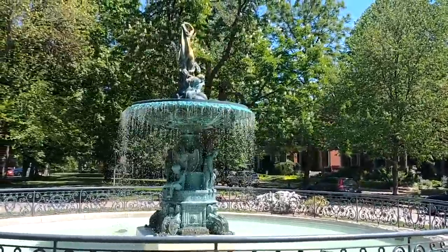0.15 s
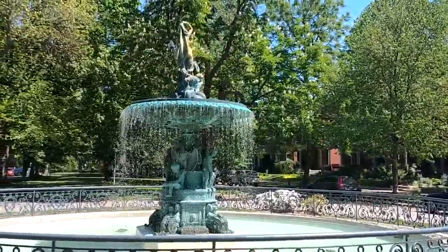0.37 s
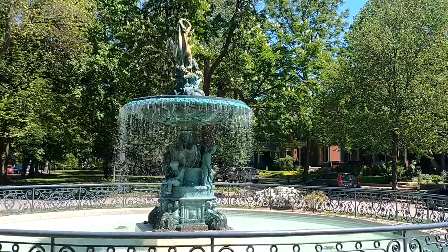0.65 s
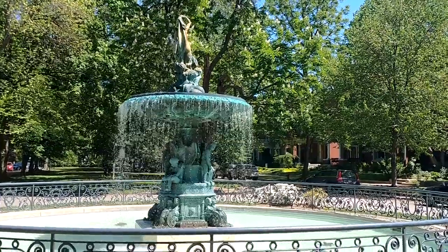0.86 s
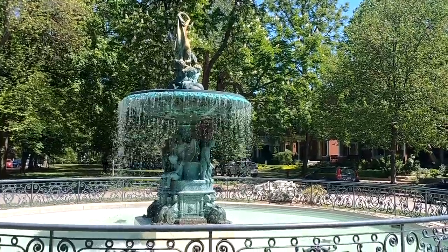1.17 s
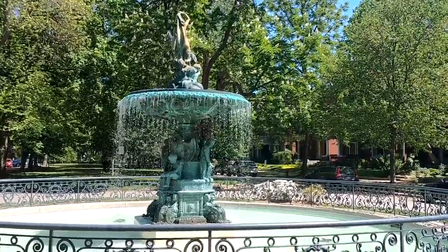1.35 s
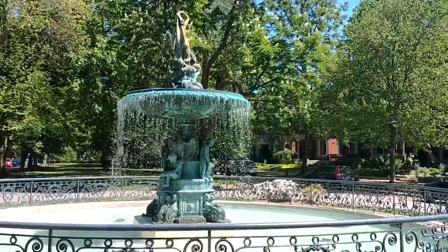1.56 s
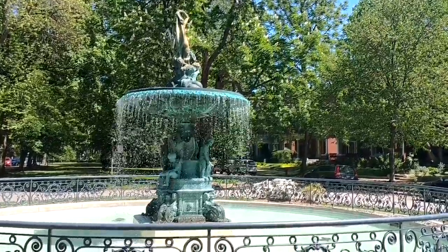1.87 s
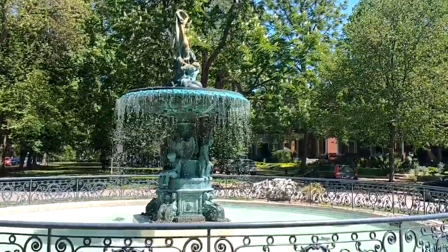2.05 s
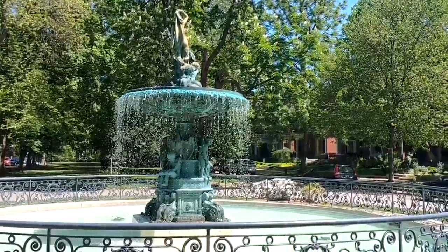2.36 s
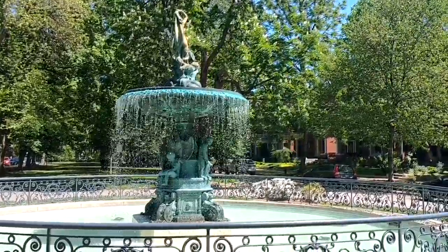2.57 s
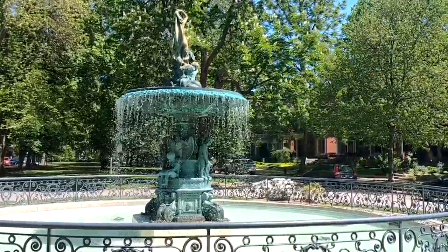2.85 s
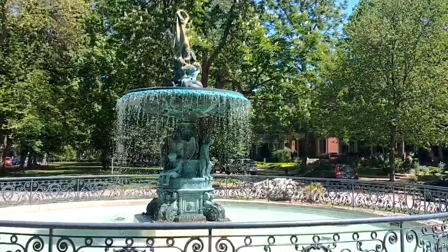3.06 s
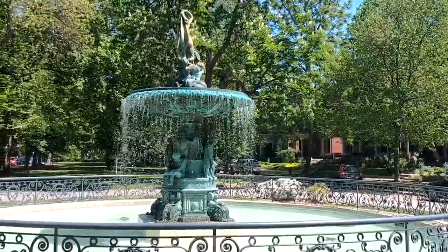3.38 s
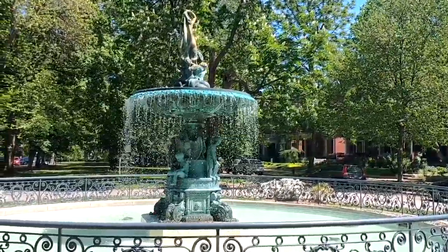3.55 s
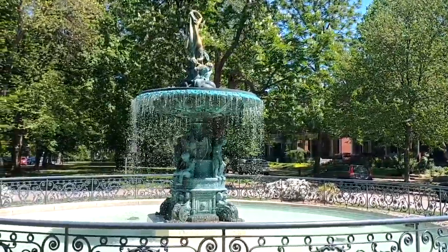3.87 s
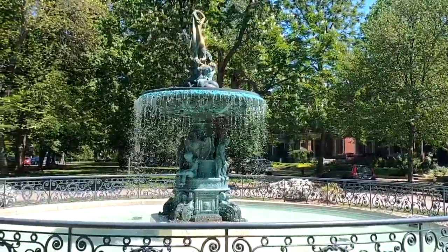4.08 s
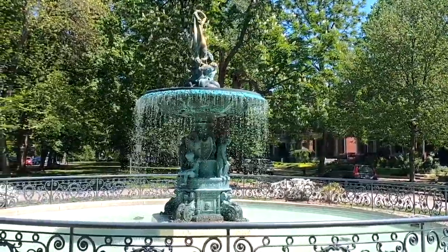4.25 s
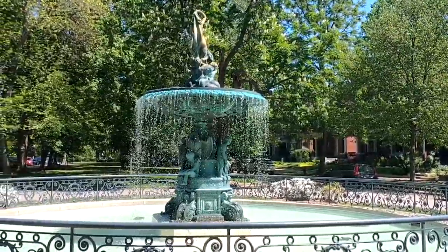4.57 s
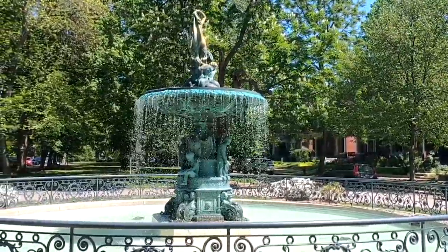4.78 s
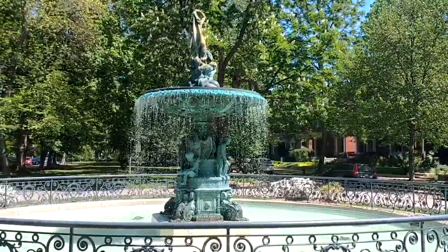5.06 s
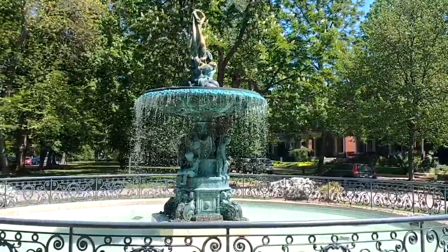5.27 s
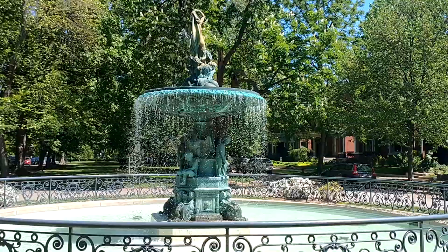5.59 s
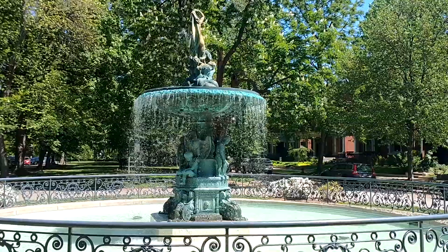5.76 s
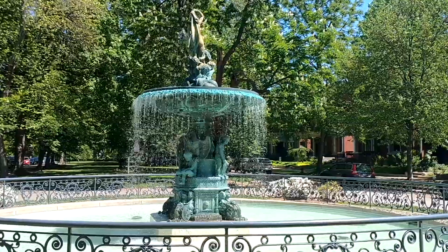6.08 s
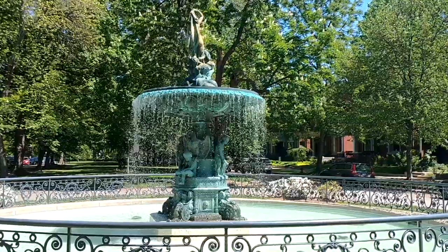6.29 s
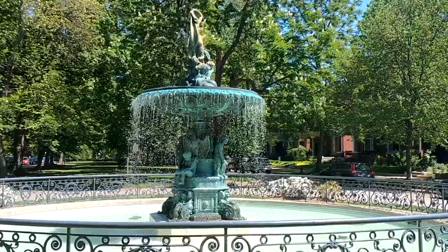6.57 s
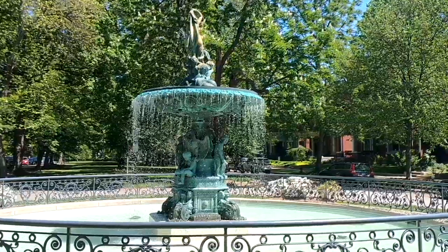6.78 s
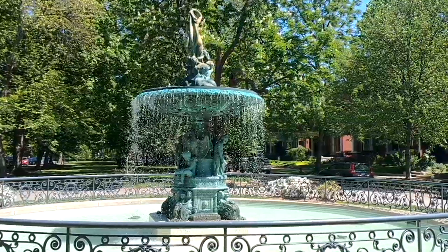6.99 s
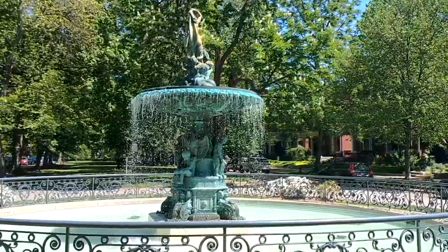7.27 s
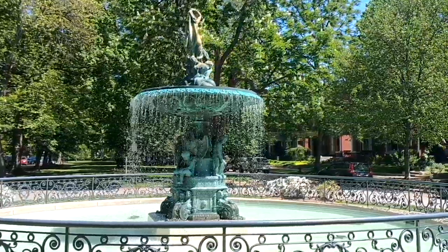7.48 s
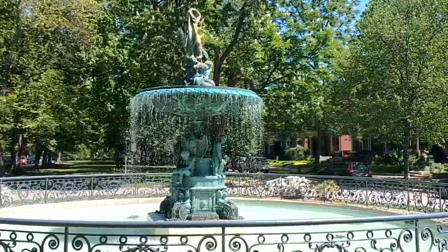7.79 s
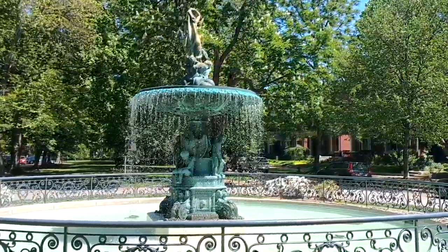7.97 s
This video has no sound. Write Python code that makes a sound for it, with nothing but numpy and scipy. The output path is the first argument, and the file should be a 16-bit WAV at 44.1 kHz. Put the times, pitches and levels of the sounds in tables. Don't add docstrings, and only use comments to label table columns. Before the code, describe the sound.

Close outdoor fountain: dense bright patter of drops, low gulps and clear plops, joined by a sharp hiss swelling on the left over faint street rumble.

```python
import sys
import numpy as np
from scipy import signal
from scipy.io import wavfile
from scipy.ndimage import uniform_filter1d

SR = 44100
rng = np.random.default_rng(int(sys.argv[2]) if len(sys.argv) > 2 else 0)


def dump(signal):
    limited = np.clip(np.atleast_2d(signal).T, -1, 1)
    pcm = np.round(limited * 32767).astype(np.int16)
    wavfile.write(sys.argv[1], SR, pcm)


def nominal_scale(level):
    x = np.asarray(level, float) / 20
    return 10 ** x


N = 358515

EDGE_DB = 4.5


def evened(x):
    return x / np.sqrt(np.mean(x ** 2) + 1e-20)


def read(points, hz):
    f, value = np.transpose(points)
    return np.interp(np.log(hz + 1), np.log(f + 1), value)


def add(mix, s, sound):
    part = mix[:, round(s * SR):][:, :sound.shape[1]]
    part += sound[:, :part.shape[1]]


def patches(shape, bins, frames):
    field = rng.standard_normal(shape[::-1]).T
    field = uniform_filter1d(field, bins, 0)
    return evened(uniform_filter1d(field, frames, 1))


def pair(a, b, size):
    # frequency [Hz], left-right likeness [0 to 1].
    likeness = [(30, .6), (60, 1), (120, 0.64), (240, 1), (480, 0.95), (950, 0.95), (1890, 0.68),
                (3770, 0.039), (7520, 0.12), (15000, 0.077)]
    hz, t, (za, zb) = signal.stft(np.array([a, b]), SR, nperseg=size, noverlap=3 * size // 4)
    half = np.arccos(np.clip(read(likeness, hz), 0, 1))[:, None] / 2
    middle, side = np.cos(half) * za, np.sin(half) * zb
    return hz, t, np.array([middle + side, middle - side])


def back(z, size):
    return signal.istft(z, SR, nperseg=size, noverlap=3 * size // 4)[1][..., :N]


def swell(t, s, rise_s, fall_s):
    return ((t - s) / np.where(t < s, rise_s, fall_s)) ** 2


def ring(hz, cycles, rise, soft=0.06):
    turns = np.arange(int(6 * cycles * SR / hz) + 4) * hz / SR
    shape = (1 - np.exp(-turns / (soft * cycles))) * np.exp(-turns / cycles)
    return shape * np.sin(2 * np.pi * turns * (1 + rise * turns / cycles)) / shape.max()


def drops(per_s=5000, spread_db=2.0, cycles=3.9, rise=0.023, wash=0.98, count=36):
    loudness = nominal_scale(spread_db * np.minimum(rng.exponential(1, N), 5))
    hits = loudness * (rng.random(N) < per_s / SR)
    kind, out = rng.integers(0, count, N), np.zeros(N)
    for k, hz in enumerate(np.geomspace(350, 12000, count)):
        bubble = ring(hz, cycles, rise)
        bubble = bubble * np.sqrt(hz) / np.linalg.norm(bubble)
        out += signal.oaconvolve(hits * (kind == k), bubble)[:N]
    return evened(out) + wash * rng.standard_normal(N)


def gush_db(hz, t):
    # peak time [s], lift [dB], bubble pitch [Hz].
    gushes = [(.04, 2, 2200), (.12, 3, 4200), (.27, 2, 2600), (.44, 2, 650), (.6, 4.5, 3260),
              (.73, 2.5, 1210), (.93, 3, 1650), (1.29, 4, 1130), (1.63, 8, 730), (1.85, 2.5, 2180),
              (2.3, 8.5, 810), (2.5, 3, 800), (2.58, 3, 3500), (3.13, 3, 1160), (3.3, 2.5, 910),
              (3.6, 5, 760), (3.93, 6, 905), (4.39, 3.5, 2100), (4.6, 2, 1460), (4.76, 6.5, 644),
              (5.02, 5.5, 1030), (5.1, 4, 2100), (5.29, 3.5, 1290), (5.5, 0.5, 1250), (5.77, 1.5, 980),
              (5.96, 2.5, 2920), (6.45, -1, 1290), (6.68, 0, 1494), (6.2, -3, 890), (6.9, -4.5, 750),
              (7.06, 0, 1900), (7.14, -1, 794), (7.22, 0, 1804), (7.42, 3.5, 780), (7.65, 5, 900),
              (7.83, 4.5, 3520), (8.05, 5, 1600)]
    rise_s, fall_s, octaves, lull_db = 0.058, 0.061, 1, -2
    surge = lull_db
    for s, db, f in gushes:
        distance = np.log2((hz[:, None] + 1) / f) / octaves
        surge = surge + db * np.exp(-swell(t, s, rise_s, fall_s) - distance ** 2)
    return surge * np.interp(hz, [330, 520, 4500, 6500], [3.8, 0.95, 1.57, 0.37])[:, None]


def curtain(db=-27.0, patchy_db=2.5, wander=0.049, size=512):
    # frequency [Hz], level [dB per Hz].
    left_colour, right_colour = [(300, -51), (450, -7.5), (700, -5.5), (1500, -5.5), (2800, -9), (3300, -8),
                                 (4100, -6.5), (5200, -5), (8000, -2), (11000, -10.5), (12000, -21),
                                 (13500, -5.5), (14300, -8), (15500, -9)], [(300, -18.5), (450, -11.5), (700, -3.5), (1500, -7),
                                               (2500, -2), (4200, -3.5), (5400, -8.5), (7500, -8.5),
                                               (9300, -7), (10300, -13), (12500, -19), (13500, -17),
                                               (14200, -16.5), (15500, -15)]
    # centre [Hz], width [Hz], lift [dB].
    left_ripple, right_ripple = [(1032, 43, -31), (1350, 470, 6.5), (1670, 126, -6.5), (2100, 73, 12.5),
                                 (2620, 147, 10.5), (3380, 230, 5), (3440, 73, 1.5)], [(1030, 40, -38), (1320, 73, 14.5), (1720, 100, 0.5),
                                                      (1987, 180, 9), (3224, 70, -41), (3260, 250, 5),
                                                      (3880, 58, -16), (4083, 134, 8), (4840, 61, 8),
                                                      (6700, 310, 11), (8500, 260, -1)]
    hz, t, z = pair(drops(), drops(), size)
    surge = gush_db(hz, t)
    drift = wander * patches((1, len(t)), 1, 60) * np.clip(2000 / (hz[:, None] + 1), 0, 1)
    drifted_hz = hz[:, None] * (1 + drift)
    for k, (colour, ripple) in enumerate([(left_colour, left_ripple), (right_colour, right_ripple)]):
        shape = read(colour, hz) - 40 * np.clip(1 - hz / 300, 0, 1)
        echo = sum(lift * np.exp(-((drifted_hz - f) / width) ** 2) for f, width, lift in ripple)
        z[k] *= nominal_scale(shape[:, None] + echo + surge)
    return nominal_scale(db) * back(z * nominal_scale(patchy_db * patches(z[0].shape, 3, 22)), size)


def hiss(flicker_db=0.73, patchy_db=1.0, leak_db=-50, spit_db=0.07, size=512):
    # time [s], hiss level [dB], peak of the band [Hz].
    flow = [(0.0, -49, 6860), (0.13, -33, 6660), (0.34, -27, 7220), (0.8, -40.5, 6440), (0.97, -32, 7100),
            (1.18, -33, 7040), (1.29, -27.5, 7530), (1.49, -29.5, 7230), (1.58, -23.5, 7900),
            (1.79, -30, 7360), (1.9, -27.5, 7420), (2.45, -26, 7220), (2.65, -24, 7450), (2.87, -28, 7350),
            (3.69, -27.5, 7430), (4.3, -18, 8650), (4.46, -18, 9230), (5.7, -17, 9130)]
    # frequency [Hz], level [dB per Hz].
    slow_colour, fast_colour = [(4800, -51), (5600, -8), (6300, 3), (6900, 6.5), (7600, 3.5), (8600, -5.5),
                                (10300, -7.5), (11200, -16.5), (11800, -36.5), (12600, -83)], [(5500, -50.5), (6900, -30), (7250, -26), (7600, -11.5),
                                              (8200, -3), (9000, 1), (10200, -1.5), (11400, -1.5),
                                              (12500, -7), (13500, -6), (14200, -13), (14800, -25),
                                              (15500, -24)]
    slow_peak_hz, fast_peak_hz = 7090, 9370
    speed_up = 1.094
    hz, t, z = signal.stft(rng.standard_normal(N), SR, nperseg=size, noverlap=3 * size // 4)
    s, db, peak_hz = np.transpose(flow)
    fast = (np.interp(t, s, peak_hz) - slow_peak_hz) / (fast_peak_hz - slow_peak_hz)
    fast = np.clip(fast, -.2, 1)
    scaled = (hz[:, None] + 1) / speed_up ** fast
    shape = (1 - fast) * read(slow_colour, scaled) + fast * read(fast_colour, scaled * speed_up)
    linger_hz, width_hz, linger_db, end_s, fade_s = 6920, 730, 13, 5.7, 0.33
    linger = np.maximum(fast, 0) * np.clip((end_s - t) / fade_s, 0, 1)
    shape = shape + linger_db * linger * np.exp(-((hz[:, None] - linger_hz) / width_hz) ** 2)
    shape = nominal_scale(shape) * (hz > 3500)[:, None]
    shape = shape / np.sqrt((shape ** 2).mean(0))
    chance = flicker_db * patches((1, len(t)), 1, 3) + patchy_db * patches(z.shape, 12, 15)
    x = back(z * shape * nominal_scale(np.interp(t, s, db) + chance), size)
    spits = evened(uniform_filter1d(rng.exponential(1, N) ** 2 - 2, size=60))
    return 2 * x * nominal_scale(spit_db * spits) * nominal_scale(np.array([[0], [leak_db]]))


def breeze(t):
    # peak time [s], level of the third shaft order [dB], rise [s], fall [s].
    swells = [(.08, -48, 0.067, 0.23), (1.13, -47.5, 0.09, 0.064), (2.35, -33, 0.31, 0.37),
              (3.1, -42.5, 0.29, 0.11), (4.07, -49.5, 0.054, 0.097), (4.6, -58, .2, 0.13),
              (5.07, -52.5, 0.2, 0.15), (5.6, -49.5, 0.21, 0.22), (6.2, -45, 0.037, 0.22),
              (6.85, -54, 0.17, 0.1), (7.6, -57, 0.038, 0.067), (8.05, -46.5, 0.12, .3)]
    calm_db = -64
    power = nominal_scale(calm_db) ** 2
    for s, db, rise_s, fall_s in swells:
        power = power + nominal_scale(db - EDGE_DB * swell(t, s, rise_s, fall_s)) ** 2
    return 10 * np.log10(power)


def engine(shaft_hz=48.07, wander=0.0012):
    # multiple of shaft speed, level relative to the third [dB].
    followers = [(2, -23), (4, -19.5), (6, -27)]
    t = np.arange(N) / SR
    drift = evened(uniform_filter1d(rng.standard_normal(N), size=8000))
    turn = 2 * np.pi * np.cumsum(shaft_hz * (1 + wander * drift)) / SR

    def order(k):
        return np.sqrt(2) * np.sin(k * turn + 2 * np.pi * rng.random())

    low = order(3) + sum(nominal_scale(db) * order(k) for k, db in followers)
    seventh = order(7)
    seventh = seventh * (1 + 0.39 * evened(uniform_filter1d(rng.standard_normal(N), size=400)))
    peak_s, peak_db, half_s = 2.556, -49, 0.15
    return nominal_scale(breeze(t)) * low + nominal_scale(peak_db - EDGE_DB * swell(t, peak_s, half_s, half_s)) * seventh


def street(level_db=-53, follows=0.42, steady=0.93, patchy_db=3.5, size=2048):
    # frequency [Hz], level [dB per Hz].
    rumble = [(25, -14), (50, -11.5), (80, 0.5), (120, 3), (200, -7.5), (290, -7.5), (400, -11.5),
              (600, -87)]
    # peak time [s], lift [dB].
    murmurs = [(.1, 9), (2.3, 1), (2.6, 14.5), (3.08, 11.5), (3.6, 11.5), (3.98, 13.5), (4.25, 5),
               (4.5, 10.5), (5.2, 6.5), (5.72, 5.5), (5.95, 6), (6.4, 6), (7.03, 3), (7.38, 9.5), (7.7, 8)]
    hz, t, z = pair(*rng.standard_normal((2, N)), size)
    z *= nominal_scale(read(rumble, hz) - 60 * (hz > 900))[:, None]
    z[1] *= nominal_scale(np.interp(hz, [60, 200], [3, -1.5]))[:, None] * np.exp(.45j)
    db = follows * breeze(t)
    swing = (db - np.mean(db)) * np.interp(hz, [40, 90, 130, 268], [.3, 1, 1, 1 - steady])[:, None]
    murmur = 0.5 * (t - t.mean())
    murmur = murmur + sum(lift * np.exp(-swell(t, s, rise_s=0.075, fall_s=0.15)) for s, lift in murmurs)
    swing = swing + murmur * np.interp(hz, [170, 260], [0, 1])[:, None]
    moving = back(z * nominal_scale(swing + patchy_db * patches(swing.shape, 5, 12)), size)
    return nominal_scale(level_db) * moving / back(z, size).std()


def taps():
    # start [s], left level [dB], right level [dB], pitch [Hz, minus for a pull], decay [cycles].
    knocks = [
        (.0505, -9, -26, 700, .3),
        (.0512, -19, -30, -200, .3),
        (.167, -12, -40, 6200, 6),
        (.8955, -17, -16, 1600, 3.5),
        (3.02, -50, -32, 90, 2),
        (3.18, -40, -27, 120, 2),
        (2.93, -50, -35, 80, 2),
        (7.141, -16, -40, 5600, 5),
    ]
    out = np.zeros((2, N))
    for s, left_db, right_db, hz, cycles in knocks:
        level = nominal_scale(np.array([[left_db], [right_db]]))
        add(out, s, level * np.sign(hz) * ring(abs(hz), cycles, 0))
    return out


def bubbles(table, trim_db, cycles, pan_db, rise=0.002):
    # delay [s], level [dB], pitch ratio.
    trailing = [
        (.009, -5.5, 1.04),
        (.021, -7.5, .97),
    ]
    out = np.zeros((2, N))
    pan = pan_db * np.array([[.5], [-.5]])
    for s, db, hz in table:
        for late_s, less_db, ratio in [(0.00025, 0, 0.98)] + trailing:
            bubble = ring(hz * ratio, cycles, rise, soft=0.27)
            add(out, s + late_s, nominal_scale(db + trim_db + less_db + pan) * bubble)
    return out


def gulps():
    # start [s], peak level [dB], pitch [Hz].
    gulp_table = [(0.118, -32, 850), (0.208, -36, 595), (0.417, -32, 556), (0.508, -37, 740),
                  (0.692, -29.5, 666), (1.005, -37, 710), (1.279, -29.5, 950), (1.958, -30, 756),
                  (2.306, -30, 635), (2.453, -32, 675), (2.545, -37, 643), (2.596, -49, 810),
                  (2.813, -31.5, 730), (2.921, -40, 716), (3.074, -40, 627), (3.145, -32, 650),
                  (3.274, -31, 737), (3.606, -33.5, 560), (3.752, -31, 752), (3.936, -29.5, 926),
                  (4.692, -27.5, 659), (4.775, -27.5, 700), (4.986, -25, 855), (5.122, -41, 653),
                  (5.243, -33, 620), (5.298, -31, 787), (5.446, -32.5, 815), (5.511, -35, 820),
                  (5.596, -37, 872), (5.694, -29, 840), (5.789, -28, 873), (6.042, -43, 859),
                  (6.362, -40, 664), (6.432, -33, 780), (6.505, -41, 830), (6.582, -36, 557),
                  (6.662, -35, 875), (6.883, -31.5, 753), (7.134, -29, 880), (7.389, -33, 789),
                  (7.519, -43, 640), (7.663, -37, 770), (7.87, -32.5, 774), (7.962, -38, 675),
                  (8.04, -30.5, 796)]
    return bubbles(gulp_table, trim_db=-3.0, cycles=6.5, pan_db=2.5)


def plops():
    # start [s], peak level [dB], pitch [Hz].
    plop_table = [(0.301, -18.5, 2560), (0.4161, -23, 1410), (0.5184, -23, 2070), (0.671, -21, 2030),
                  (0.7284, -21, 1520), (0.8975, -24, 1400), (0.92, -20, 1325), (0.942, -20, 1340),
                  (1.3113, -23, 1305), (1.599, -19.5, 1950), (1.726, -15, 2480), (1.7612, -19.5, 2620),
                  (1.805, -21, 1850), (1.839, -20, 1350), (1.8954, -20.5, 1364), (2.436, -22, 1320),
                  (2.4807, -23, 1270), (2.5642, -18.5, 2620), (2.986, -18, 1350), (3.1479, -18, 2100),
                  (3.28, -24, 1580), (3.346, -21.5, 1320), (3.4248, -24, 2070), (3.4841, -23, 1400),
                  (3.5287, -22, 1235), (3.5655, -29, 1320), (3.6907, -23, 1280), (3.8872, -30, 2160),
                  (3.9263, -21, 1236), (4.1058, -24, 1320), (4.13, -22, 1410), (4.295, -23, 1280),
                  (4.3636, -16, 2100), (4.3941, -28, 2120), (4.41, -17.5, 1397), (4.5208, -23, 1360),
                  (4.5532, -20, 1380), (4.5976, -15, 1440), (4.7019, -19.5, 2000), (4.8306, -22, 2100),
                  (5.0755, -10.5, 2060), (5.1439, -20, 2100), (5.1838, -21, 2090), (5.2915, -21, 1224),
                  (5.3699, -23, 4150), (5.463, -21, 1910), (5.513, -19.5, 1380), (5.617, -24, 1345),
                  (5.697, -19, 1254), (5.746, -22.5, 1350), (5.813, -21, 1300), (5.887, -25, 1800),
                  (5.9276, -20.5, 2810), (6.1436, -24, 1350), (6.4563, -19, 1310), (6.5302, -23.5, 1960),
                  (6.668, -17.5, 1320), (6.719, -22, 1204), (7.6195, -23, 1780), (7.724, -23, 1285),
                  (7.8286, -28, 1800), (7.8636, -21, 2470), (8.0433, -23, 1480)]
    return bubbles(plop_table, trim_db=-7, cycles=8.3, pan_db=-3.5)


def hoots():
    # start [s], length [s], level [dB], first pitch [Hz], last pitch [Hz].
    calls = [
        (3.706, 0.193, -42.5, 326.5, 250),
        (7.555, 0.255, -53, 253.6, 248),
    ]
    out = np.zeros((2, N))
    for s, length, db, first_hz, last_hz in calls:
        u = np.arange(0, length, 1 / SR) / length
        breath = 1 + 0.64 * evened(uniform_filter1d(rng.standard_normal(len(u)), size=250))
        pitch_hz = first_hz + (last_hz - first_hz) * u ** 2
        tone = np.sin(2 * np.pi * np.cumsum(pitch_hz) / SR) * signal.windows.tukey(len(u), .5)
        add(out, s, (np.sqrt(2) * nominal_scale(db) * breath * tone)[None] * np.ones((2, 1)))
    return out


def local(power):
    return abs(uniform_filter1d(uniform_filter1d(power, size=21, axis=2), size=9, axis=1)) + 1e-16


def drop_weak_lines(x, open_db=-62, quiet_db=-19, follow_db=9, steep=1.4, wobble_db=10, shared_hz=5200, size=1024):
    # frequency [Hz], threshold over the local level under a loud hiss [dB].
    threshold = [(600, -13), (1500, -12), (2500, -6), (3500, -2), (4500, -2), (5500, 2), (6500, 1),
                 (8000, -1), (11000, 2), (13300, 1.5), (14200, 3.5), (15000, 6), (15700, 7)]
    n, k = np.arange(2 * size)[:, None] + .5, np.arange(size) + .5
    hz = k * SR / (2 * size)
    window = np.sin(np.pi * n / (2 * size))
    basis = window * np.cos(np.pi / size * (n + size / 2) * k) * np.sqrt(2 / size)
    lead = 2 * size - 637
    blocks = np.pad(x, ((0, 0), (lead, 2 * size - (lead + N) % size))).reshape(len(x), -1, size)
    lines = np.concatenate([blocks[:, :-1], blocks[:, 1:]], axis=2) @ basis
    power = lines ** 2 * .75 / size
    loudest = abs(uniform_filter1d(power.sum(axis=2).max(axis=0), size=5))
    loud_db = 10 * np.log10(loudest + 1e-9)[:, None]
    busy = np.clip((loud_db - quiet_db) / 6, 0, 1)
    low = hz < shared_hz
    judged = np.where(low, power.mean(axis=0), power)
    local_db = 10 * np.log10(local(judged))
    over_db = np.maximum(local_db - open_db - follow_db * busy, 0) * (hz > shared_hz)
    ease_db = (1 - busy) * np.interp(hz, [2500, 5500], [9, 3.5])
    common = patches(power.shape[1:], 4, 11)
    own = np.array([patches(power.shape[1:], 3, 16) for port in x])
    wobble = np.where(low, .65 * common, .8 * common + .6 * own) * np.exp(-over_db / 9)
    wide_db = uniform_filter1d(local_db, size=49, axis=2)
    bar_db = np.where(low, local_db, wide_db) + read(threshold, hz)
    bar_db = bar_db - ease_db - steep * over_db + wobble_db * wobble
    kept = judged > nominal_scale(bar_db) ** 2
    makeup = np.sqrt(np.minimum(local(power) / local(power * kept), 6))
    halves = (lines * kept * makeup) @ basis.T
    out = halves[:, 1:, :size] + halves[:, :-1, size:]
    return out.reshape(len(x), -1)[:, lead - size:][:, :N]


def scene():
    water = curtain() + gulps() + plops()
    return water + hiss() + engine() + street() + taps() + hoots()


def roll_off(x):
    return signal.sosfilt(signal.butter(12, 15730, fs=SR, output="sos"), x)


def record(dry):
    return roll_off(np.clip(drop_weak_lines(dry), -1, 1))


dry = scene()
out = record(dry)
dump(out)
```